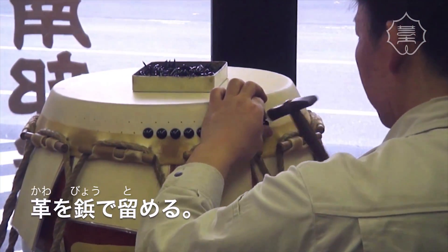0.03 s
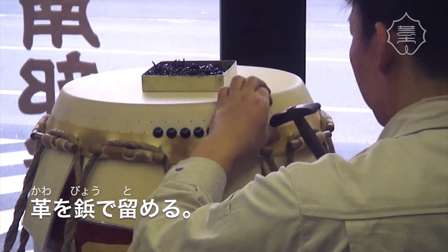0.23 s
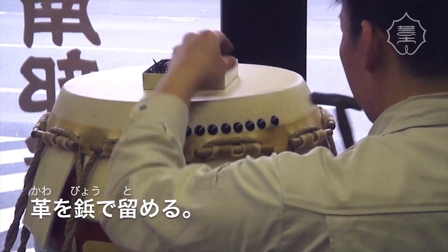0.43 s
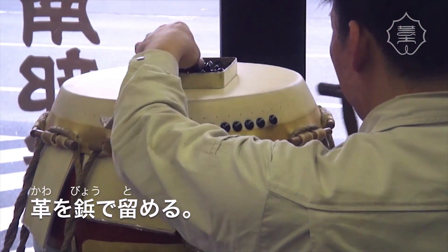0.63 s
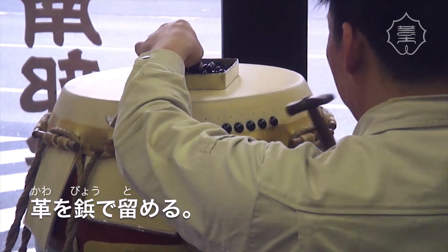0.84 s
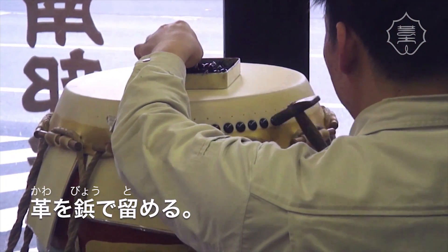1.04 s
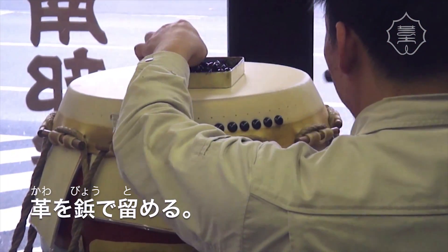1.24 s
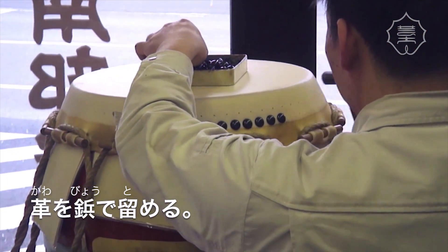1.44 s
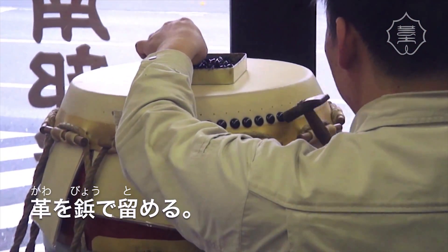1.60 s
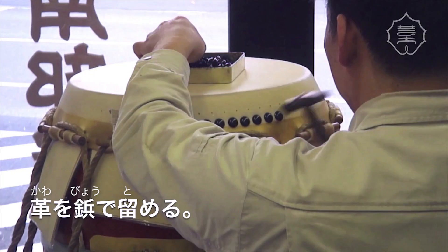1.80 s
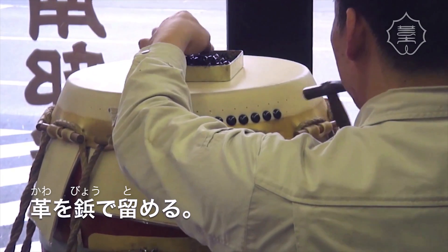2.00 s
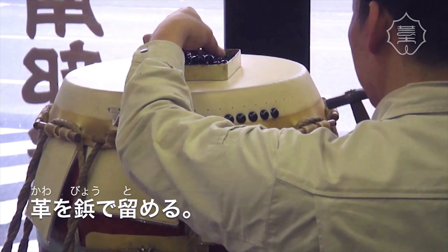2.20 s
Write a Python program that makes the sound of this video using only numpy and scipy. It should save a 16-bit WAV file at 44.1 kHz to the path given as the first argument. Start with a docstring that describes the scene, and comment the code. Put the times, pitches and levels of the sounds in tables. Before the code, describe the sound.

A hammer strikes a tack into a big drum seven times at an even pace, each steel click followed by a wooden boom in an echoing workshop. The blows grow louder and sharper while loose tacks jingle faintly in a tin.

```python
"""Hammering a tack into a drum

In an echoing workshop, seven even hammer blows drive a tack through the hide into a big drum's wooden
shell. Each is a steel click, a knock of the shell and a boom of drum and room that swells, holds and
dies away. As the tack bites, the blows grow louder, brighter and more abrupt.
Loose tacks jingle in their tin, and a hand rustles near it."""
import sys
import numpy as np
from scipy import signal
from scipy.fft import rfft, irfft
from scipy.io import wavfile

SR = 44100
rng = np.random.default_rng(int(sys.argv[2]) if len(sys.argv) > 2 else 0)


def wav_out(sig):
    """Save sig, one row per channel (or a flat mono array), as 16-bit PCM at SR to the path in sys.argv[1]."""
    wavfile.write(sys.argv[1], SR, np.round(np.clip(np.atleast_2d(sig).T, -1, 1) * 32767).astype(np.int16))


N = 103635
T = np.arange(2 ** 15) / SR   # seconds since a sound began


def hammering():
    """Seven blows on the tack, over the fading tail of a blow struck just before the start."""
    # start_s, click_db, click_stretch (times), knock_db, boom_db, swell_s, hold_s,
    # bright_hz, hollow_db, bass_db, ring_hz, head_db, wash_db
    blows = [(0.1963, -8.5, 0.38, -19.5, -22, 0.031, 0.08, 1680, 1, 2, 1120, -37, -40),
             (0.4713, -10.5, 0.69, -25.5, -16.5, .026, 0.058, 2180, -3, 2, 1050, -30, -39.5),
             (0.7361, -7.5, 0.83, -20.5, -17, .013, 0.1, 2740, -5.5, 3, 1470, -33, -40.5),
             (1.0120, -6, 1.1, -13.5, -18, 0.0054, 0.12, 2900, 3, 1, 1145, -29.5, -39),
             (1.2830, -2.5, 1.35, -13, -17, 0.0032, 0.13, 3030, 3.5, 3.5, 1420, -30.5, -37),
             (1.5423, -3.5, 1.07, -8, -15, 0.007, 0.15, 2480, 4, -0.5, 930, -33, -40.5),
             (1.7985, -5.5, 1.7, -9.5, -14, 0.0035, 0.17, 2420, -3, -8, 1790, -40.5, -43)]
    earlier_blow = (-0.06, -10, .3, -30, -19, 0, -0.16, 2252, 3.5, 2, 1298, -41.5, -44.5)   # one row, same columns
    shared_noise = white_noise()
    return sum(delayed(blow(shared_noise, *row), start_s) for start_s, *row in [earlier_blow, *blows])


def blow(shared_noise, click_db, click_stretch, knock_db, boom_db, swell_s, hold_s,
         bright_hz, hollow_db, bass_db, ring_hz, head_db, wash_db):
    """One blow: a click and a knock, then the boom of shell, drumhead and room."""
    def tone(hz):
        """This blow's gain at each pitch: a hollow band, a ringing peak, bass and a dulled top."""
        hollow = hollow_db * np.exp(-((hz - 573) / 59) ** 2)
        ring = 3 * np.exp(-((hz - ring_hz) / 79) ** 2)
        bass = bass_db / (1 + (hz / 400) ** 10)
        return from_db(hollow + ring + bass) / np.sqrt(1 + (hz / bright_hz) ** 5.92)

    room = room_boom(shared_noise, tone)
    shell = shell_ring(tone)
    boom = from_db(boom_db) * (room + shell) * envelope(swell_s, hold_s, fall_db_per_s=113.5)
    head = from_db(head_db) * drumhead()
    wash = from_db(wash_db) * room_wash(hold_s)
    knock = from_db(knock_db) * shell_knock(shell, tone)
    click = from_db(click_db) * steel_click(click_stretch)
    return click + knock + boom + head + wash


def steel_click(stretch):
    """Hammer meets tack: a tiny push, a steel ring (longer as the tack bites) and two duller echoes."""
    # ringing steel: pitch_hz, level_db, fade_s (time to drop 60 dB, before stretching)
    steel_modes = [(1510, -19.5, 0.00043), (2860, -0.5, 0.0033), (5010, -5.5, 0.0021), (6370, -15, 0.0025)]
    # echoes from nearby surfaces: delay_s, level_db
    echoes = [(.0041, -10), (0.0129, -12.5)]
    ring = sum(from_db(db - 60 * T / (fade_s * stretch)) * np.sin(2 * np.pi * hz * T)
               for hz, db, fade_s in steel_modes)
    push = from_db(-15.5) * np.exp(-T / 0.00023)
    direct = filtered(ring, "highpass", hz=760, order=1) + push
    dulled = filtered(direct, "lowpass", hz=3900, order=1)
    return direct + sum(from_db(db) * delayed(dulled, delay_s, len(T)) for delay_s, db in echoes)


def shell_knock(shell, tone):
    """The struck wood knocks: a short burst of noise with some of the shell's ring in it."""
    # tone of the knock: pitch_hz, level_db
    spectrum = [(60, -30), (300, -21), (600, 0), (850, 1), (1200, 3), (2600, -4.5), (4000, -1.5),
                (7000, 4.5), (11000, -1.5)]
    fade_s = 0.023   # time to drop 60 dB
    burst = coloured(white_noise(), spectrum, tone) + from_db(-6.5) * shell
    return filtered(burst * from_db(-60 * T / fade_s), "highpass", hz=250, order=2)


def shell_ring(tone):
    """The wooden shell rings at many pitches at once."""
    # ringing wood: pitch_hz, level_db
    shell_modes = [(581, -13), (604, -8), (640, -16), (705, -16), (877, -13.5), (926, -18), (1003, -15),
                   (1035, -12), (1133, -24.5), (1170, -11.5), (1288, -13.5), (1458, -8), (1696, -16.5),
                   (1812, -22), (1993, -15), (2072, -25), (2497, -18)]
    shaped_modes = [(hz, db + 20 * np.log10(tone(hz))) for hz, db in shell_modes]
    return from_db(-4) * ringing(shaped_modes, scatter_db=3.5)


def drumhead():
    """The stretched hide swells into a low hum, then stops quickly."""
    # ringing hide: pitch_hz, level_db
    head_modes = [(156, -24), (199, -18), (269, 0.5), (283, -14), (349, -19.5)]
    return ringing(head_modes, scatter_db=1.5) * envelope(swell_s=0.039, hold_s=0.19, fall_db_per_s=402.5)


def room_boom(shared_noise, tone):
    """The drum's sound spreads through the room and blurs into noise."""
    # tone of the boom: pitch_hz, level_db
    spectrum = [(40, -65), (115, -52), (160, -30.5), (210, -14), (300, -7.5), (480, -13), (580, 2.5),
                (760, -3.5), (1000, 1.5), (1450, 1.5), (2000, -1.5), (2700, -5), (3600, -10.5),
                (6000, -10.5), (11000, -40)]
    alike = 0.6   # share of the noise power that every blow has in common
    noise = np.sqrt(alike) * shared_noise + np.sqrt(1 - alike) * white_noise()
    return coloured(noise, spectrum, lambda hz: tone(hz) * ripple(hz))


def ripple(hz, depth_db=2.5, spacing_hz=35):
    """Random peaks and dips in gain: each blow favours different pitches of the shell."""
    heights = rng.standard_normal(2000)
    return from_db(depth_db * np.interp(hz / spacing_hz, np.arange(len(heights)), heights))


def room_wash(boom_hold_s):
    """The steel click lingers in the room as a bright hiss."""
    # tone of the hiss: pitch_hz, level_db
    spectrum = [(1500, -15), (3000, 3.5), (4500, 1), (6500, -3.5), (9000, -7), (11000, -27)]
    loudness = envelope(swell_s=0.0057, hold_s=0.87 * boom_hold_s, fall_db_per_s=77)
    return coloured(white_noise(), spectrum) * loudness


def hollow_note(peak_s=0.267, pitch_hz=630, level_db=-23, half_length_s=0.011):
    """The first boom swells briefly into a hollow note."""
    t = np.arange(N) / SR - peak_s
    loudness = from_db(level_db) * np.exp(-(t / half_length_s) ** 2)
    return np.sqrt(2) * loudness * np.sin(2 * np.pi * (pitch_hz * t + rng.random()))


def tack_jingles():
    """Loose tacks jingle as they settle in their tin."""
    # jingles: start_s, level_db
    jingles = [(0, -37), (0.234, -40), (.5, -46)]
    # tone of the settling tacks: pitch_hz, level_db
    spectrum = [(2500, -3), (4200, -11), (5200, -12), (5900, 2), (6600, -1), (7400, -12), (8500, -6.5),
                (9200, -17), (10000, -6), (11200, -32)]
    return bursts(jingles, spectrum, envelope(swell_s=0.0013, hold_s=0.032, fall_db_per_s=183))


def tack_clinks():
    """Tacks clink softly as fingers pick among them."""
    # clinks: start_s, level_db
    clinks = [(1.182, -35), (1.23, -31.5), (1.754, -36.5), (2.1, -50)]
    # tone of a clink: pitch_hz, level_db
    spectrum = [(1500, -12), (3200, 7.5), (6300, -3), (8500, -15), (11000, -22)]
    return bursts(clinks, spectrum, envelope(swell_s=0.0053, hold_s=0, fall_db_per_s=250))


def hand_rustle(start_s=2.272, level_db=-49.5):
    """A hand rustles near the tin at the very end."""
    # tone of the rustle: pitch_hz, level_db
    spectrum = [(500, -20), (2000, -3), (3300, 3), (6500, -6), (8000, -16), (11000, -23)]
    return bursts([(start_s, level_db)], spectrum, envelope(swell_s=0.018, hold_s=1, fall_db_per_s=0))


def workshop_background(level_db=-53):
    """The faint, steady noise of the workshop."""
    # tone of the background: pitch_hz, level_db
    spectrum = [(25, -34), (55, -26), (90, -2.5), (170, 2), (300, 3.5), (600, 5), (1300, 2), (3000, -4.5),
                (6500, -11), (11000, -32)]
    return from_db(level_db) * coloured(white_noise(N), spectrum)


def from_db(db):
    """Turns decibels into a gain to multiply by."""
    return 10 ** (np.asarray(db) / 20)


def white_noise(size=len(T)):
    """Fresh noise, equally strong at every pitch."""
    return rng.standard_normal(size)


def coloured(white, spectrum, shape=lambda hz: 1):
    """Gives white noise a tone (spectrum times shape) while keeping its overall level."""
    hz = np.maximum(np.fft.rfftfreq(len(white), 1 / SR), 1)
    pitch_hz, level_db = np.array(spectrum).T
    gain = from_db(np.interp(np.log(hz), np.log(pitch_hz), level_db)) * shape(hz)
    return irfft(rfft(white) * gain, len(white)) / np.sqrt(np.mean(gain ** 2))


def bursts(events, spectrum, loudness):
    """One burst of fresh noise for each (start_s, level_db) event."""
    return sum(delayed(from_db(db) * coloured(white_noise(), spectrum) * loudness, start_s)
               for start_s, db in events)


def ringing(modes, scatter_db):
    """A steady sine for each mode (natural pitch), varied at random in strength and phase."""
    return sum(np.sqrt(2) * from_db(db + scatter_db * rng.standard_normal())
               * np.sin(2 * np.pi * (hz * T + rng.random())) for hz, db in modes)


def envelope(swell_s, hold_s, fall_db_per_s, sag_db_per_s=29.5):
    """Loudness over time: it swells, sags slowly while it holds, then falls."""
    swell = 1 - np.exp(-T / max(swell_s, 1e-4))
    falling_s = np.logaddexp(0, (T - hold_s) / .02) * .02   # time past the hold, eased in
    return swell * from_db(-sag_db_per_s * (T - falling_s) - fall_db_per_s * falling_s)


def delayed(sound, start_s, size=N):
    """Places a sound at start_s; a negative start skips its beginning."""
    start = int(round(start_s * SR))
    return np.pad(sound[max(-start, 0):], (max(start, 0), size))[:size]


def filtered(sound, kind, hz, order):
    """A "highpass" softens what lies below hz, a "lowpass" what lies above."""
    return signal.sosfilt(signal.butter(order, hz, kind, fs=SR, output="sos"), sound + 1e-18)


def scene():
    """The blows, the tacks and the hand over the workshop's background, in one channel."""
    mix = hammering() + hollow_note() + tack_jingles() + hand_rustle() + tack_clinks()
    return (mix + workshop_background())[None]


def record(dry, ceiling=0.77, cutoff_hz=11000):
    """Rounds off the loudest peaks and cuts the highest treble."""
    rounded = dry / (1 + (dry / ceiling) ** 4) ** (1 / 4)
    low_pass = signal.ellip(10, .2, 80, cutoff_hz, fs=SR, output="sos")
    return signal.sosfilt(low_pass, rounded)


dry = scene()
out = record(dry)
wav_out(out)
```